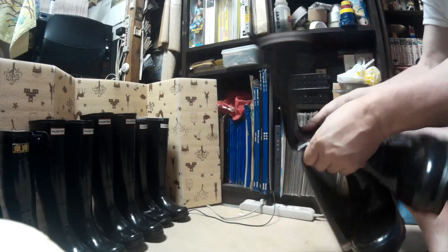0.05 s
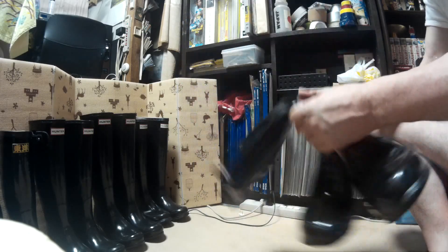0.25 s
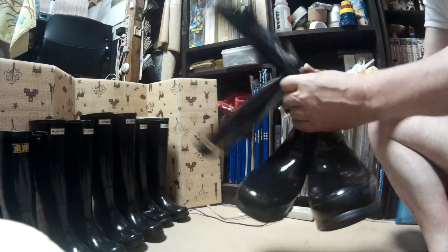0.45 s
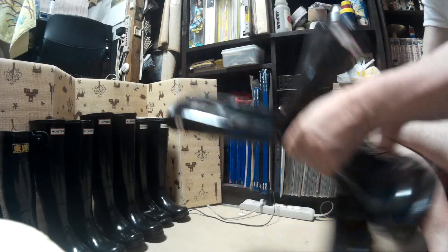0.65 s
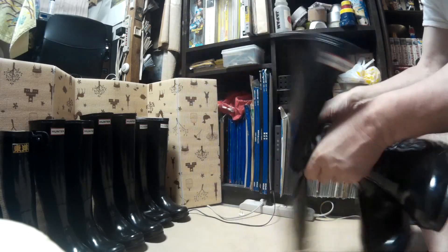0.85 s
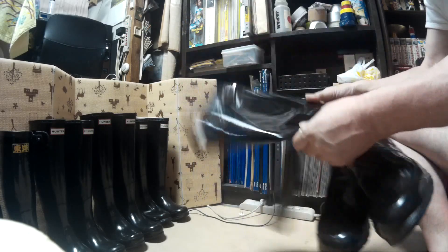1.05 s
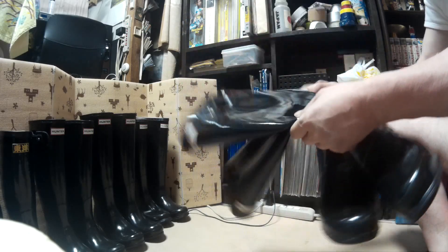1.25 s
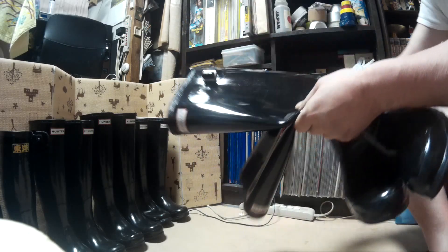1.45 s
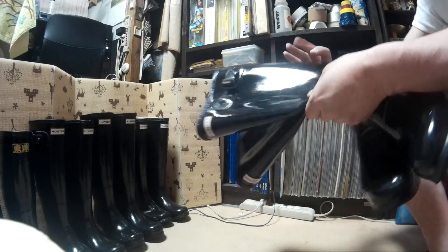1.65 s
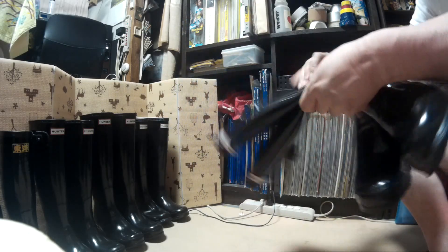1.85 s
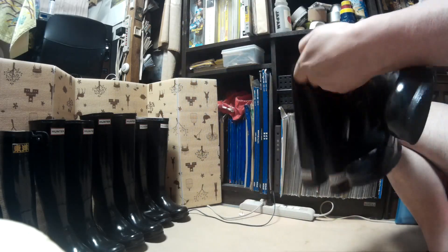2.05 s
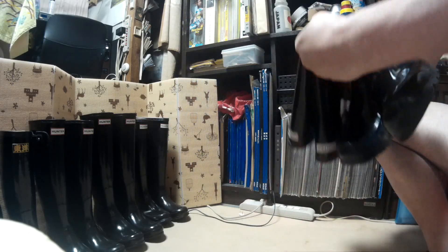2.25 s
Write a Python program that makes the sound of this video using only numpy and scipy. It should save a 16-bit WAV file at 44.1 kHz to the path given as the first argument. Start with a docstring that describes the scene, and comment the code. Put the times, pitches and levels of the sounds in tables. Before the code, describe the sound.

In a small room, a pair of rubber boots knocks together in two hollow slaps among softer taps and scuffs. A longer, gripping rub with a dull knock follows as they are gathered, with short echoes and a faint hum.

```python
"""In a small, cluttered room, a pair of rubber boots is swung by hand. Twice the hollow shafts (the boot
legs) slap together and ring; in between they flop, tap and scuff against each other. Then the boots are
gathered up: a long rub of rubber sticking and slipping on rubber, with one dull knock in it.
Shelves and boxes throw the sound back, over a faint, steady hum."""
import sys
import numpy as np
from scipy import signal
from scipy.fft import rfft, irfft, next_fast_len
from scipy.io import wavfile

SR = 44100
rng = np.random.default_rng(int(sys.argv[2]) if len(sys.argv) > 2 else 0)


def dump_mix(stems):
    """Bounce the given channels to the path in sys.argv[1] as a 16-bit WAV at rate SR."""
    frames = np.atleast_2d(stems).T  # one column per channel
    limited = np.clip(frames, -1, 1)  # hard clip at full scale
    pcm = np.round(limited * 32767).astype(np.int16)
    wavfile.write(sys.argv[1], SR, pcm)


N = 101429
TIME = np.arange(N) / SR

# The notes of a shaft's air and walls.
# Each row: pitch in Hz, level in dB, ring time in seconds (the time to fade by 60 dB).
SHAFT_NOTES = [(602, -36.5, 0.052), (733, -58.5, 0.13), (1230, -67.5, 0.013), (1423, -23.5, 0.023),
               (1806, -65, 0.089), (2200, -84, 0.01), (4070, -41, .03)]
# The thump of air pushed out of a boot. Each row: pitch in Hz, level in dB, ring time in seconds.
AIR_THUMP = [(105, -55, 0.22), (168, -48.5, 0.044), (255, -35, 0.086)]


def slaps():
    """The shafts meet flat in a few quick contacts, ring hollow and push out air."""
    # Each row: start in seconds, strength, treble, hollow ring and change for the later contacts
    # (all in dB), the wall's note in Hz, its level in dB.
    hits = [(0.2112, 10, -3.5, 4.5, -3.5, 2770, -36), (1.1106, 8.5, -2.5, -4, -8, 3974, -28.5)]
    # The tone of a slap. Each row: frequency in Hz, level in dB.
    tone = [(50, -28), (130, -6), (260, -0.5), (600, -3), (950, 3), (1350, -2.5), (1650, -6), (2100, -1.5),
            (2650, -3.5), (3150, -14), (4000, -14), (6200, -13.5), (8500, -24.5), (10500, -18.5),
            (15500, -38)]
    # How many seconds each later contact comes after the first.
    lags = [.00175, .0026]
    out = 0
    for start, db, treble_db, ring_db, later_db, hz, note_db in hits:
        later = sum(contact(start + lag, db + later_db - 2 * k, settle_s=0.004, settle_db=-1)
                    for k, lag in enumerate(lags))
        force = treble(click(start, db) + later, treble_db)
        body = from_db(ring_db) * ring(force, SHAFT_NOTES) + ring(force, [(hz, note_db, 0.038)])
        thump = from_db(-14.5) * ring(force, AIR_THUMP)
        out += colour(force + body, tone) + thump
    return through_wall(out)


def flops_and_taps():
    """Softer touches sound a bent wall's brief note; a flop also pops a crease and pushes out air."""
    # A shaft buckles. Each row: start in seconds, strength in dB, treble in dB, settling time in seconds,
    # wall note in Hz, crease snap in dB, air thump in Hz, its level in dB, its ring time in seconds.
    flops = [(0.0490, -2, 3, 0.0034, 1250, -43, 105, -47, 0.17),
             (0.9315, -8, 1.5, 0.012, 840, -48, 264, -52, .06),
             (1.9670, 6, -4.5, 0.0023, 730, -68, 255, -39.5, 0.053)]
    # Light touches. Each row: start in seconds, strength in dB, treble in dB, wall note in Hz.
    taps = [(0.01, -13.5, -7, 970), (0.136, -17, 8, 2150), (0.181, -27, -10, 1260), (0.195, -7, -2, 795),
            (0.591, -15.5, -16, 800), (0.714, -21.5, -20, 800), (0.749, -27, -18, 650),
            (0.828, -21.5, -2, 1080), (1.008, -13, 1, 1280), (1.026, -13, 9, 1890), (1.087, -15, -22, 600),
            (1.316, -21.5, -13, 1580), (1.365, -14.5, -6, 1600), (1.453, -21.5, 5.5, 1580),
            (1.576, -18.5, 1.5, 1300), (1.667, -24.5, -9, 1070), (1.804, -14.5, 1, 1510),
            (1.838, -20, -11, 1230), (1.922, -6, -9, 1080), (1.940, -15.5, -5, 1490), (2, -7.5, 2, 1270),
            (2.0412, -9, -1, 1130), (2.101, -13, -17, 1150), (2.1506, -17.5, -25, 814),
            (2.214, -17, 1, 1110), (2.27, -27, -8, 850)]
    # The tone of a soft touch. Each row: frequency in Hz, level in dB.
    tone = [(50, -15), (200, -6.5), (420, -6), (750, -0.5), (1300, -5), (1900, -5), (2500, -13),
            (3100, -23), (3900, -18.5), (5500, -32.5), (9000, -40.5), (15500, -48)]
    note_db, note_ring_s = -37, 0.025
    snap_hz, snap_ring_s = 3930, 0.014
    touches = [(contact(start, db, settle_s, settle_db=2.5), treble_db, hz)
               for start, db, treble_db, settle_s, hz, *_ in flops]
    touches += [(contact(start, db, settle_s=0.0051, settle_db=5), treble_db, hz)
                for start, db, treble_db, hz in taps]
    wall = sum(treble(force + ring(force, [(hz, note_db, note_ring_s)]), treble_db)
               for force, treble_db, hz in touches)
    hollow = from_db(-27) * ring(wall, SHAFT_NOTES)
    buckle = sum(ring(click(start, 0), [(snap_hz, snap_db, snap_ring_s), (hz, db, ring_s)])
                 for start, *_, snap_db, hz, db, ring_s in flops)
    return through_wall(colour(wall + hollow, tone) + buckle)


def rubbing():
    """Short scuffs and one long rub: slipping rubber, heard directly and through the hollow shafts."""
    # Each row: start and length in seconds, level and treble in dB, hollow note in Hz, its boost in dB.
    scuffs = [(0.12, 0.025, -61.5, 9, 2150, -3), (0.135, 0.013, -45.5, 2, 2130, -5),
              (0.428, 0.074, -68, -2, 1460, -12), (0.49, 0.057, -58.5, -0.5, 2500, -10),
              (0.567, 0.12, -70, -22, 583, 4), (0.767, 0.04, -75, 14, 1910, -5),
              (0.825, 0.045, -58.5, -13, 1100, -1), (0.866, 0.027, -52.5, -6, 601, -1),
              (0.95, 0.014, -50.5, 5.5, 1190, -9), (0.973, 0.033, -58, -18, 480, 2.5),
              (1.019, 0.0084, -51, 10, 558, 7.5), (1.036, .029, -64, 11.5, 2080, 7),
              (1.085, 0.027, -51, -19, 581, 8), (1.179, 0.048, -55.5, -7, 1200, -25),
              (1.321, 0.078, -64.5, -7, 1640, -10), (1.453, 0.034, -56, -1.5, 1590, 4),
              (1.668, 0.012, -62, -15, 1160, -6), (2.042, 0.0607, -51, -4.5, 1146, 1.5),
              (2.154, 0.083, -76, -16, 1260, 4)]
    # The long rub as the boots are gathered up. Each row: time in seconds, level in dB.
    swell = [(1.70, -81), (1.76, -56), (1.80, -50), (1.85, -40.5), (1.89, -44), (1.935, -38.5),
             (1.96, -47.5), (2.00, -54.5), (2.03, -54), (2.06, -76)]
    # Air in the shafts while pressed together. Each row: pitch in Hz, level in dB, ring time in seconds.
    pressed_notes = [(128.7, -40.5, 0.22), (616.5, -47, 0.15), (1230, -54, .04)]
    # The tone of rubbing. Each row: frequency in Hz, level in dB.
    tone = [(50, -29.5), (150, -11), (380, -6.5), (600, 6), (900, 0.5), (1250, 4.5), (2100, -2), (2600, -5),
            (3200, -13), (4100, -15), (5500, -22.5), (9000, -32.5), (15500, -46)]
    hollow_db, hollow_ring_s = -30.5, 0.026
    attack_s, release_s = 0.0043, 0.0027
    grain = slips()
    grain /= np.std(colour(grain, tone))
    long_rub = grain * from_db(np.interp(TIME, *np.transpose(swell), left=-120, right=-120))
    pressed_ring = from_db(0.5) * ring(long_rub, pressed_notes)
    hand_rustle = from_db(-69.5) * grain
    out = treble(long_rub + pressed_ring, db=-10) + hand_rustle
    for start, length, db, treble_db, hz, boost_db in scuffs:
        rise = np.clip((TIME - start) / attack_s, 0, 1)
        fall = np.exp(-np.maximum(TIME - start - length, 0) / release_s)
        scuff = treble(grain * rise * fall * from_db(db), treble_db)
        out += scuff + ring(scuff, [(hz, hollow_db + boost_db, hollow_ring_s)])
    thump = from_db(-20) * ring(long_rub, AIR_THUMP)
    return colour(out, tone) + thump


def slips(per_second=1900, spread_db=3.3):
    """Rubber sticks and slips in a dense run of tiny, uneven jerks."""
    sizes = from_db(spread_db * np.minimum(rng.exponential(1, N), 4))
    directions = rng.choice([-1, 1], N)
    slipping = rng.random(N) < per_second / SR
    return rms_one(sizes * directions * slipping)


def contact(start, db, settle_s, settle_db):
    """A first touch, then the soft wall settles in a dying patter of tiny contacts."""
    age = TIME - start
    patter = rng.standard_normal(N) * (age > 0) * np.exp(-np.abs(age) / settle_s)
    return click(start, db) + from_db(db + settle_db) * patter / np.sqrt(np.sum(patter ** 2))


def click(start, db):
    """A single push, one sample long."""
    return -from_db(db) * (np.arange(N) == int(start * SR))


def ring(force, notes):
    """A push sets notes ringing, each fading at its own rate."""
    out = 0
    for hz, db, ring_s in notes:
        decay = from_db(-60 / (ring_s * SR))
        turn = decay * np.cos(2 * np.pi * hz / SR)
        out += from_db(db) * signal.lfilter([1, -turn], [1, -2 * turn, decay ** 2], force + 1e-18)
    return out


def through_wall(x, delay_at_1khz_s=0.0007):
    """Bending waves cross the rubber, and the high notes arrive first."""
    size = next_fast_len(N + SR // 4)
    hz = np.arange(size // 2 + 1) * SR / size
    phase_lag = 4 * np.pi * delay_at_1khz_s * np.sqrt(1000 * hz)
    return irfft(rfft(x, size) * np.exp(-1j * phase_lag), size)[:N]


def treble(x, db, above_hz=2500):
    """Turn the highs up or down: harder contacts are brighter."""
    low = signal.lfilter(*signal.butter(1, above_hz, fs=SR), x + 1e-18)
    return low + from_db(db) * (x - low)


def colour(x, tone, size=8192):
    """Give a sound the tone listed in a table."""
    cepstrum = irfft(np.log(from_db(at_hz(tone, np.arange(size // 2 + 1) * SR / size))))
    # Fold the second half onto the first, so nothing sounds before its cause (minimum phase).
    cepstrum[1:size // 2] *= 2
    cepstrum[size // 2 + 1:] = 0
    response = irfft(np.exp(rfft(cepstrum)))[:size // 2]
    return signal.fftconvolve(x, response)[:N]


def at_hz(table, hz):
    """Read between a table's rows, with octaves evenly spaced."""
    frequencies, values = np.transpose(table)
    return np.interp(np.log(hz + 1e-9), np.log(frequencies), values)


def from_db(db):
    """Turn decibels into a multiplier."""
    return 10 ** (np.asarray(db) / 20)


def rms_one(x):
    """Scale a sound to an average (rms) level of 1."""
    return x / np.sqrt(np.mean(x ** 2) + 1e-20)


def room(x):
    """Dense echoes off shelves and boxes die away, each frequency band at its own rate."""
    # Echo strength. Each row: frequency in Hz, level against the direct sound in dB.
    levels = [(100, -7), (300, -7), (600, -4.5), (1300, -5.5), (2600, -5.5), (5000, -2), (11000, -4.5)]
    # Echo length. Each row: frequency in Hz, seconds to fade by 60 dB.
    fade_times = [(100, .21), (1300, .175), (2600, .16), (11000, .165)]
    delay_s, build_s, hold_s = 0.002, 0.002, 0.018
    t = TIME[:SR // 2]
    hz = np.arange(len(t) // 2 + 1) * SR / len(t)
    noise_spectrum = rfft(rng.standard_normal(len(t)))
    edges_hz = np.geomspace(60, 17000, 40)
    build = np.clip((t - delay_s) / build_s, 0, 1)
    echoes = 0
    for low, high in zip(edges_hz, edges_hz[1:]):
        centre = np.sqrt(low * high)
        fade = from_db(-60 * np.maximum(t - hold_s, 0) / at_hz(fade_times, centre))
        band = irfft(noise_spectrum * ((hz >= low) & (hz < high)), len(t)) * build * fade
        band *= np.sqrt(2 * (high - low) / SR / np.sum(band ** 2))  # as strong as the direct sound
        echoes += from_db(at_hz(levels, centre)) * band
    return signal.fftconvolve(x, echoes)[:N]


def background_hum():
    """Faint, steady noise, strongest in the bass."""
    # Each row: frequency in Hz, relative level in dB.
    tone = [(15, 5), (25, -0.5), (102, 2), (363, -2), (416, -6.5), (2110, -19.5), (2350, -40), (2550, -16),
            (3250, -21.5), (3720, -16.5), (4250, -19.5), (13600, -20.5), (16000, -25.5)]
    return from_db(-62.5) * rms_one(colour(rng.standard_normal(N), tone))


def scene():
    """The boots, their echoes and the hum, in one channel."""
    boots = slaps() + flops_and_taps() + rubbing()
    return (boots + room(boots) + background_hum())[None]


def record(dry, cutoff_hz=16100):
    """Cut off the very highest frequencies steeply."""
    return signal.sosfilt(signal.ellip(10, .1, 70, cutoff_hz, fs=SR, output="sos"), dry)


dry = scene()
out = record(dry)
dump_mix(out)
```